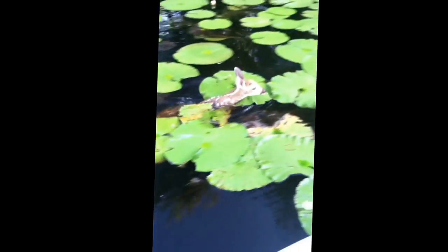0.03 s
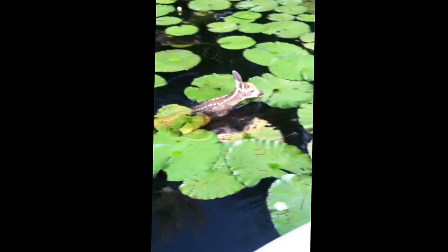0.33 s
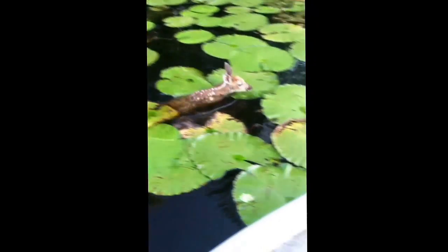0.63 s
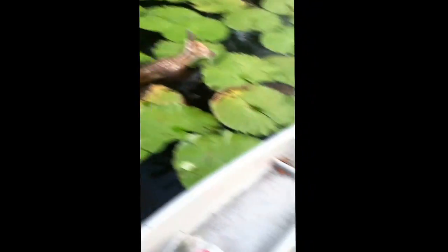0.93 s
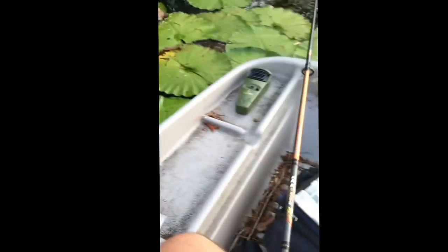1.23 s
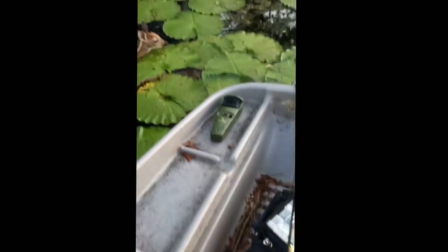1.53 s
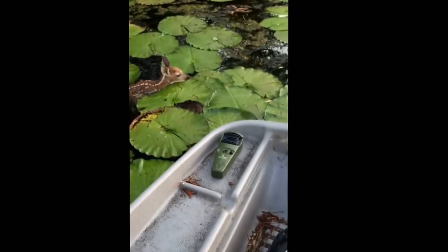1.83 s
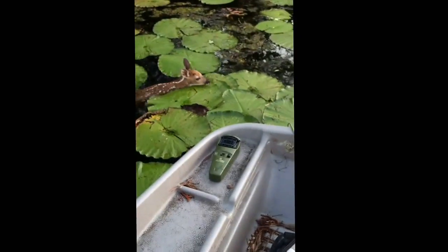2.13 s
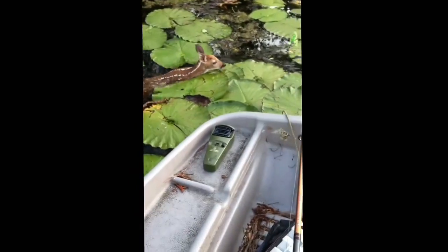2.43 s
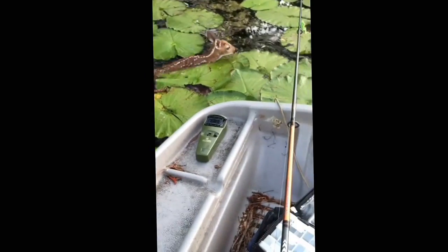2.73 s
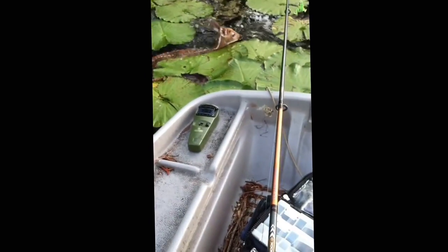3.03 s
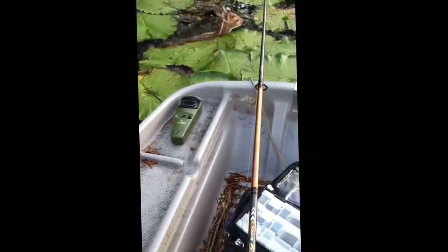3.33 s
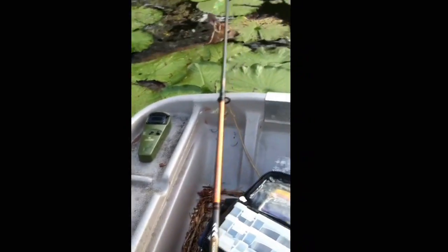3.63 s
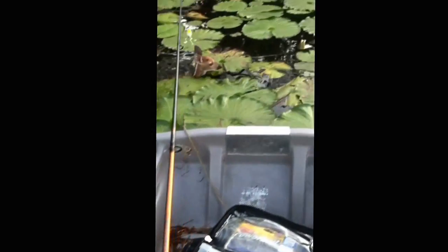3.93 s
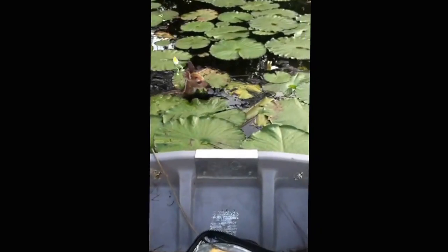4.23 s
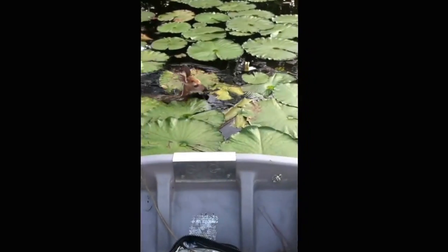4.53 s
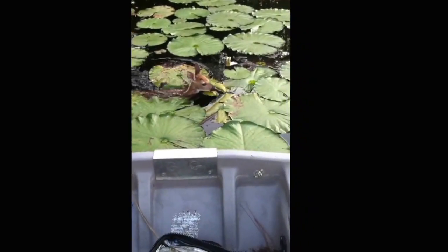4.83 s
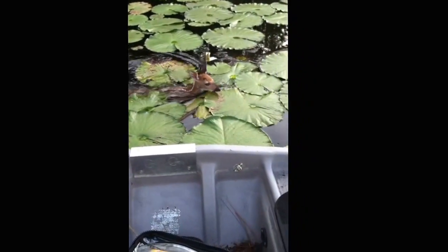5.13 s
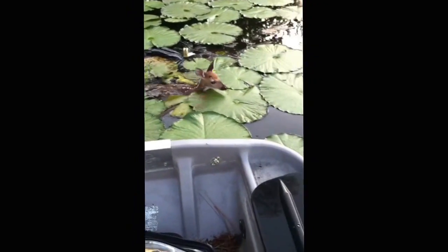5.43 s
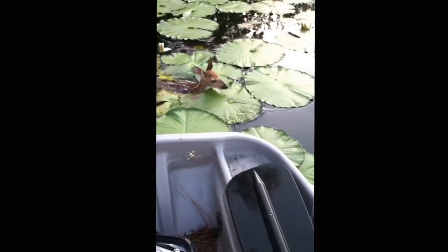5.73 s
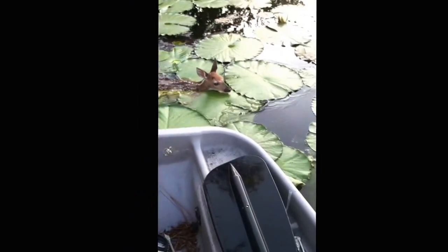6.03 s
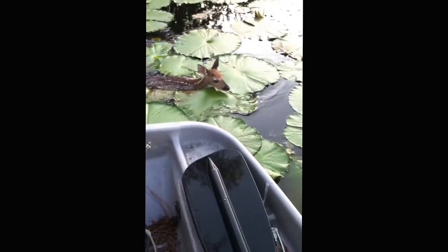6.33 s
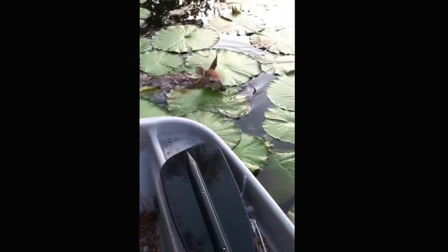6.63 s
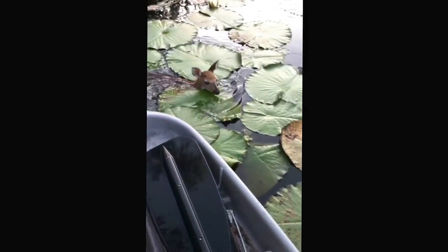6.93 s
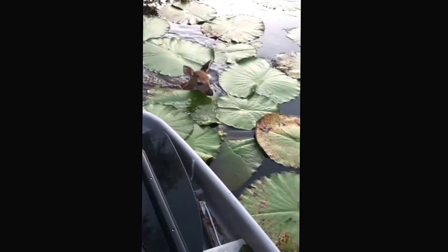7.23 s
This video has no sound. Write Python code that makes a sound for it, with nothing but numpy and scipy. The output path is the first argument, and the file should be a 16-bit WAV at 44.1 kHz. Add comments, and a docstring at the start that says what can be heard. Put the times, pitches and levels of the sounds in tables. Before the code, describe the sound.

A quiet pond is heard through a small microphone in a plastic boat, with low air and steady hiss throughout. For the first two seconds a swimming fawn makes a soft wash and close, bubbly drips, with a dull hull bump at 0.7 seconds. A bird warbles faintly from 1.2 to 2.5 seconds, and a frog rattles weakly at 2.2. Around 2.5 seconds gear scrapes briefly and clatters sharply against the hull, by far the loudest sound. Faint breathy whistles surround it until about 3.2. A soft bump follows at 3.7. From 4.1 to 6.5 seconds distant birds give faint falling whistles. The frog's dry, pulsing rattle comes clearly from 4.8 to 5.6. Tiny tackle ticks occur here and there. Light drips return around 6 seconds, and a small swish of water with two soft bumps comes just after 7.

```python
"""Lily pond from a small boat

Heard through a small microphone in a plastic boat. Close by, a fawn swims through the pads: a soft wash,
and drips that ring as bubbles. Something shifts aboard and knocks sharply, ringing the hull; faint,
breathy whistling tones sound around the knocks. One bird warbles, others slide down far off, and a frog
pulses its throat in a dry rattle, first faintly, then clearly. Low air and a steady hiss lie beneath."""
import sys
import numpy as np
from scipy import signal
from scipy.fft import rfft, irfft
from scipy.io import wavfile

SR = 44100
rng = np.random.default_rng(int(sys.argv[2]) if len(sys.argv) > 2 else 0)


def to_wav(s):
    """Save 16-bit WAV."""
    ch = np.atleast_2d(s).T  # columns
    pcm = np.round(np.clip(ch, -1, 1) * 32767)  # PCM
    wavfile.write(sys.argv[1], SR, pcm.astype(np.int16))


N = 325458
TIME = np.arange(N) / SR


def from_db(db):
    """Decibels to gain."""
    return 10 ** (np.asarray(db) / 20)


def rms_one(x):
    """Scale to an rms of 1."""
    return x / np.sqrt(np.mean(x ** 2) + 1e-20)


def add(out, start_s, sound):
    """Mix a sound in at start_s."""
    at = max(0, round(start_s * SR))
    out[at:at + len(sound)] += sound[:max(0, N - at)]


def cut(x, side, hz, order=2):
    """Butterworth filter; side is "lowpass" or "highpass"."""
    return signal.sosfilt(signal.butter(order, hz, side, fs=SR, output="sos"), x)


def drift(rate_hz):
    """A random wander with an rms of 1."""
    knots = rng.standard_normal(int(N / SR * rate_hz) + 2)
    return rms_one(np.interp(TIME * rate_hz, np.arange(len(knots)), knots))


def noise(spectrum, grain=1):
    """Noise roughened by the gain grain, then shaped by rows of freq_hz, level_db; rms 1."""
    hz, db = np.transpose(spectrum)
    bins_hz = np.maximum(np.arange(N // 2 + 1) * SR / N, 1)
    gain = from_db(np.interp(np.log(bins_hz), np.log(hz), db))
    return rms_one(irfft(rfft(rng.standard_normal(N) * grain) * gain, N))


def swells(rows, attack_s, release_s):
    """Gain over time: each swell rises, holds and dies away."""
    power = 0
    for start_s, length_s, db in rows:
        attack = np.clip((TIME - start_s) / attack_s, 0, 1)
        release = np.exp(-np.maximum(TIME - start_s - length_s, 0) / release_s)
        power += (from_db(db) * attack * release) ** 2
    return np.sqrt(power)


def ring(hz, t60_s, swell_cycles, octaves_per_s=0):
    """A damped sine that swells over its first cycles and may climb by up to an octave."""
    t = TIME[:int(1.3 * t60_s * SR) + 8]
    phase = 2 * np.pi * np.cumsum(hz * 2 ** np.minimum(octaves_per_s * t, 1)) / SR
    onset = 1 - np.exp(-t * hz / swell_cycles)
    return np.sin(phase) * onset * from_db(-60 * t / t60_s)


def body(modes, swell_cycles, ring_share=1):
    """All modes of a body answering one blow; a contact that stays on shortens their ring."""
    out = np.zeros(SR // 5)
    for hz, db, t60_s in modes:
        mode = from_db(db) * ring(hz, t60_s * ring_share, swell_cycles)[:len(out)]
        out[:len(mode)] += mode
    return out


# Spectra of the air over the pond, a hollow murmur and the hiss: freq_hz, level_db
AIR_SPECTRUM = [(30, -7), (60, -4.5), (85, 3), (115, 3), (200, -0.5), (300, -.5), (450, -11), (800, -24),
                (2000, -43)]
MURMUR_SPECTRUM = [(80, -18), (170, -5.5), (340, 1), (520, -9), (1200, -32), (5000, -70)]
HISS_SPECTRUM = [(80, -21), (300, 2.5), (1000, 2), (2000, -1), (3000, -3), (4500, -7), (6500, -9.5),
                 (8000, -9.5), (9400, -6), (10200, -15.5), (13000, -20), (15700, -26)]
# Swells of the murmur: start_s, length_s, level_db
MURMUR_SWELLS = [(0.27, 0.38, -65), (2.62, 0.47, -67)]

def pond_air():
    """Low open air that flutters and slowly settles, a murmur that swells twice, and a steady hiss."""
    air = from_db(-67.5 - .5 * TIME + 2 * drift(20)) * noise(AIR_SPECTRUM)
    murmur = swells(MURMUR_SWELLS, attack_s=.11, release_s=.22) * noise(MURMUR_SPECTRUM)
    hiss = from_db(-66.5) * noise(HISS_SPECTRUM)
    return air + murmur + hiss


def woods(direct, wet_db, t60_s):
    """Trees on the bank scatter a thin tail that reaches the boat after the direct sound."""
    t = TIME[:SR]
    tail = rng.standard_normal(SR) * from_db(-60 * t / t60_s) * (t > .02)
    return direct + from_db(wet_db) * signal.fftconvolve(direct, tail / np.linalg.norm(tail))[:N]


def whistle(length_s, pitches_hz, levels_db, waver, flutter_db):
    """A near-sine note bending through evenly spaced pitches and levels, never quite steady."""
    progress = np.linspace(0, 1, int(length_s * SR))
    hz = np.interp(progress, np.linspace(0, 1, len(pitches_hz)), pitches_hz)
    db = np.interp(progress, np.linspace(0, 1, len(levels_db)), levels_db)
    hz *= 1 + waver * drift(330)[:len(hz)]
    db += flutter_db * drift(90)[:len(db)]
    envelope = np.abs(np.sin(np.pi * progress)) ** .35 * from_db(db)
    return envelope * np.sin(2 * np.pi * np.cumsum(hz) / SR)


# A far bird repeating one downward slide: start_s, length_s, level_db
FAR_SLIDES = [(4.602, .26, -66.5), (5.101, .15, -67), (5.521, 0.16, -66.5), (5.944, .17, -65),
              (6.375, 0.16, -68)]
# Faint whistling tones; the held ones near 1.6 and 2.8 kHz are hoarse and breathy: # start_s, length_s,
# start_hz, end_hz, level_db, hoarseness (share of the pitch)
FAINT_TONES = [(2.098, 0.14, 1640, 1540, -57.5, .03), (2.342, 0.21, 2900, 2795, -64.5, 0.019),
               (2.584, .62, 2745, 2800, -64.5, .026), (2.657, 0.355, 1630, 1650, -66, .05),
               (4.11, .065, 2700, 1946, -67.5, .015), (4.164, .1, 1890, 1782, -65, .012),
               (4.389, .32, 2950, 2240, -67, 0.006), (6.214, 0.066, 2530, 2480, -63.5, .008),
               (6.5, .45, 2900, 2870, -73, 0.034)]

def faint_whistles():
    """A far bird's falling slides, and faint whistling tones made breathy by a fast pitch waver."""
    out = np.zeros(N)
    slide_hz, slide_db = [3600, 3380, 2890, 2256, 1850, 1740], [1, 0, -8, 0, 2.5, 2]
    for start_s, length_s, db in FAR_SLIDES:
        slide = whistle(length_s, slide_hz, slide_db, waver=.022, flutter_db=3.8)
        add(out, start_s, from_db(db) * slide)
    for start_s, length_s, start_hz, end_hz, db, hoarseness in FAINT_TONES:
        tone = whistle(length_s, [start_hz, end_hz], [0, 0, -1, -7], waver=hoarseness, flutter_db=3)
        add(out, start_s, from_db(db) * tone)
    return from_db(-2) * woods(out, wet_db=-4, t60_s=.8)


# The nearest bird's song: start_s, length_s, pitch_hz, level_db, syllable
SONG = [(1.2, .085, 3520, -66.5, "rise"), (1.338, 0.078, 4480, -62, "hook"),
        (1.588, .089, 3560, -64.5, "rise"), (1.721, 0.072, 4620, -60, "hook"),
        (1.878, .036, 4423, -62.5, "fall"), (1.927, .057, 4920, -62.5, "sag"),
        (2.026, .042, 4300, -60.5, "fall"), (2.088, .04, 3918, -60.5, "rise"),
        (2.183, .025, 5000, -66, "sag"), (2.21, .037, 5303, -67, "sag"), (2.296, 0.052, 3750, -63, "sag"),
        (2.348, 0.029, 4000, -64, "fall"), (2.465, .092, 4990, -69, "sag")]
# The bend of each syllable: pitch_ratio at even steps through the note
SYLLABLE_BENDS = {"rise": [.88, 1, 1.06], "hook": [1.0, .99, 1.0, 1.02, 1.12, .97, .87, .86, .87], "fall":
                  [1.05, 1.03, .94, .78], "sag": [1.04, 1, .98]}

def warbler():
    """The nearest bird strings four kinds of syllable into a quick song; each fades a little."""
    out = np.zeros(N)
    for start_s, length_s, hz, db, syllable in SONG:
        pitches_hz = hz * np.array(SYLLABLE_BENDS[syllable])
        note = whistle(length_s, pitches_hz, [.5, -2.5], waver=.011, flutter_db=2.6)
        add(out, start_s, from_db(db) * note)
    return woods(out, wet_db=-9.5, t60_s=.45)


# Resonances of the frog's throat: pitch_hz, level_db, t60_s
THROAT_MODES = [(688, -1, 0.039), (945, 5.5, 0.012), (1150, -4, 0.0082), (2460, -9, 0.0093)]
# Its rattles on the pond, one faint, one clear: start_s, length_s, level_db
FROG_RATTLES = [(2.199, .29, -52), (4.84, .745, -44)]

def frog():
    """Runs of dry pulses ring the throat; each run starts a little slow and weak, then beats evenly."""
    gap_s, warm_up_s, lag_s = .0573, .0583, .0063
    out = np.zeros(N)
    pulse = body(THROAT_MODES, swell_cycles=1)
    for start_s, length_s, db in FROG_RATTLES:
        for t in gap_s * np.arange(round(length_s / gap_s)):
            weakness = np.exp(-t / warm_up_s)
            pulse_db = db - 3 * weakness + .84 * rng.standard_normal()
            add(out, start_s + t + lag_s * (1 - weakness), from_db(pulse_db) * pulse)
    return out


# Faint dry ticks of tackle in the boat: start_s, peak_db, brightness_hz
TACKLE_TICKS = [(0.185, -53, 9000), (0.839, -50, 9100), (4.783, -52.5, 11960), (5.466, -48, 7000),
                (5.497, -47, 4000), (7.083, -50.5, 12000)]

def tackle():
    """Tiny contacts near the microphone, each a crack of a millisecond or two."""
    out, t = np.zeros(N), TIME[:SR // 50]
    for start_s, db, brightness_hz in TACKLE_TICKS:
        burst = rng.standard_normal(len(t)) * np.exp(-t / .00147)
        crack = cut(burst, "lowpass", brightness_hz)
        add(out, start_s, from_db(db) * crack / np.abs(crack).max())
    return out


# The swish of water close by: freq_hz, level_db
SWISH_SPECTRUM = [(100, -26.5), (250, -5.5), (500, -8.5), (800, -6), (1250, -2.5), (2000, -7.5),
                  (3500, -17.5), (6000, -24), (10000, -48)]
# Surges stirred by the fawn and the boat: start_s, length_s, level_db
WATER_SURGES = [(0, 1.22, -71.5), (1.1, 0.76, -69), (2.1, 0.22, -70.5), (2.65, 0.63, -71),
                (4.45, 1.2, -74.5), (7.125, .3, -63.5)]

def wash(bubble_count=1600, calm_db=-77):
    """Stirred water: a soft swish with tiny bubbles, both following the same surges."""
    bubbles = np.zeros(N)
    for when, pitch, faintness in rng.random((bubble_count, 3)):
        hz = 700 * 4 ** pitch
        bubble = ring(hz, t60_s=9 / hz, swell_cycles=.95, octaves_per_s=19)
        add(bubbles, when * N / SR, from_db(-18 * faintness) * bubble)
    swish = noise(SWISH_SPECTRUM) * from_db(drift(25))
    stir = np.hypot(from_db(calm_db), swells(WATER_SURGES, attack_s=.0089, release_s=.16))
    return stir * (from_db(1.5) * swish + from_db(-2) * rms_one(bubbles))


def drip(db, hz, t60_s, usual_db=-42):
    """A drip throws a little spray and traps a bubble whose pitch climbs as it nears the surface."""
    t = TIME[:SR // 8]
    bright_noise = np.diff(rng.standard_normal(len(t) + 1))
    spray = cut(bright_noise, "lowpass", .52 * hz) * np.exp(-t / .016)
    out = from_db(-14) * spray / np.abs(spray).max()
    climb = 12.8 * from_db(.9 * (db - usual_db))   # a stronger drip's bubble climbs faster
    add(out, 0, ring(hz, t60_s, swell_cycles=.24, octaves_per_s=climb))
    return from_db(db) * out


# Single drips among the pads, close to the boat: start_s, level_db, pitch_hz, t60_s
CLOSE_DRIPS = [(0.0905, -39.5, 870, 0.05), (0.1442, -37.5, 1860, 0.018), (0.1853, -36, 1150, 0.0075),
               (0.1872, -44.5, 820, .025), (0.403, -43.5, 607, 0.059), (0.5265, -47.5, 1250, 0.022),
               (0.858, -42, 1360, 0.057), (1.1902, -38, 1560, 0.01), (1.2435, -41.5, 900, .019),
               (1.258, -34.5, 1236, 0.0066), (1.318, -48, 1937, 0.023), (1.629, -42, 900, 0.011),
               (1.6917, -43.5, 1005, 0.018), (1.985, -42.5, 1020, 0.07), (4.6645, -44.5, 1970, 0.016),
               (6.063, -45, 1198, 0.03)]
# Dribbles of smaller drops: start_s, length_s, drops_per_s, level_db, pitch_hz
CLOSE_DRIBBLES = [(1.199, .026, 115, -43, 1250), (1.473, 0.25, 21, -47.5, 875),
                  (5.904, .04, 50, -52.5, 902), (6.12, .9, 9, -59, 1600)]

def splashes():
    """The swimming fawn's single drips, and dribbles whose drops vary in timing, size and pitch."""
    out = np.zeros(N)
    for start_s, db, hz, t60_s in CLOSE_DRIPS:
        add(out, start_s, drip(db, hz, t60_s))
    for start_s, length_s, drops_per_s, db, hz in CLOSE_DRIBBLES:
        for t in np.arange(0, length_s, 1 / drops_per_s):
            late, size, pitch = rng.standard_normal(3)
            drop = drip(db + 1.4 * size, hz * 2 ** (.158 * pitch), t60_s=.025)
            add(out, start_s + t + .2 * late / drops_per_s, drop)
    return out


def contact(blow, hz, q):
    """A springy contact passes the lows, rings briefly at hz and cuts what lies above."""
    warped_rate = .5 / np.tan(np.pi * hz / SR)
    return signal.lfilter(*signal.bilinear([1], [1, 1 / q, 1], warped_rate), blow)


# Resonances of the plastic hull: pitch_hz, level_db, t60_s
HULL_MODES = [(174.1, -21, .035), (226, -5, 0.034), (450, -15.5, 0.0084), (529.18, 3.5, .019),
              (857, -10.5, .022), (1015, -11.5, .016), (1100, -12, 0.017), (1367, -14.5, .017),
              (1680, -20, 0.017), (2060, -21, 0.013), (2265, -22, .008), (3245, -24.5, 0.0098),
              (3478, -29.5, 0.015), (3950, -33, .006), (7400, -33, .004), (8900, -36.5, .004)]
# Blows on it, near the microphone: start_s, level_db, contact_hz, ring_share (of the free ring time)
HULL_KNOCKS = [(0.6925, -25.5, 300, 0.27), (2.4978, -16, 745, 0.27), (2.5282, -11, 1084, 0.2),
               (2.5613, -22, 449.8, 0.26), (2.5692, -12.5, 3510, 0.32), (2.5727, -1.5, 8370, 0.98),
               (2.5746, -10.5, 1500, 0.51), (3.668, -28.5, 210, 0.38), (7.1482, -38.5, 900, 0.38),
               (7.268, -36.5, 307, 0.86)]

def hull():
    """Gear slides with a short scrape, bumps, then drops hard against the hull and bounces."""
    knocks = np.zeros(N)
    for start_s, db, contact_hz, ring_share in HULL_KNOCKS:
        blow = body(HULL_MODES, swell_cycles=.77, ring_share=ring_share)
        add(knocks, start_s, from_db(db) * contact(blow, contact_hz, q=2.1))
    # The scrape builds up to the hardest knock: time_s, level_db
    slide = [(2.44, -110), (2.475, -58.5), (2.505, -52), (2.548, -53.5), (2.57, -39.5), (2.582, -110)]
    grit_spectrum = [(60, -32.5), (200, -4.5), (1000, .5), (1700, -11),
                     (3200, -12.5), (5700, -32), (8000, -21), (13000, -45)]
    grit = noise(grit_spectrum, grain=from_db(3 * drift(300)))
    scrape = from_db(np.interp(TIME, *np.transpose(slide))) * grit
    return cut(knocks + scrape, "highpass", hz=133)   # the small hull radiates little bass


def scene():
    """From the boat, in mono: hull and water are close and dry; the birds sit among the trees."""
    surroundings = pond_air() + faint_whistles() + warbler() + frog()
    return (surroundings + tackle() + wash() + splashes() + hull())[None]


def record(dry):
    """A small microphone loses the bass; the top is cut steeply."""
    bass_hz, top_hz = 121, 15700
    thin = cut(dry, "highpass", bass_hz, order=4)
    return signal.sosfilt(signal.ellip(10, .1, 80, top_hz, fs=SR, output="sos"), thin)


dry = scene()
out = record(dry)
to_wav(out)
```